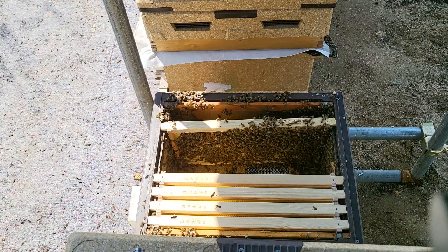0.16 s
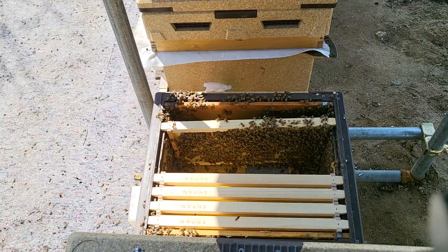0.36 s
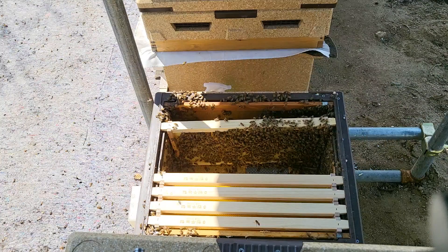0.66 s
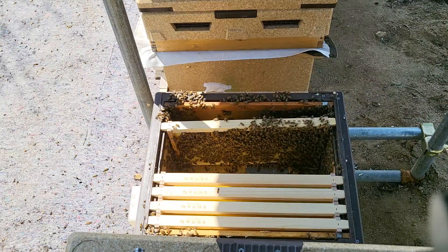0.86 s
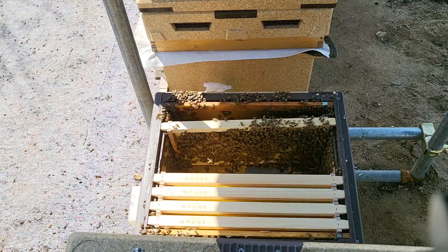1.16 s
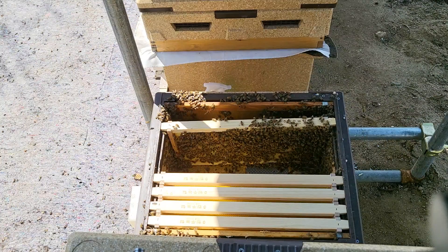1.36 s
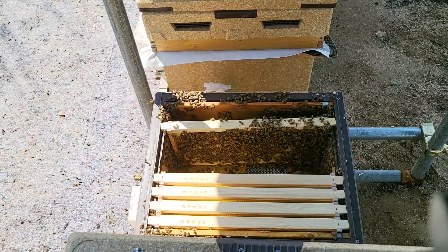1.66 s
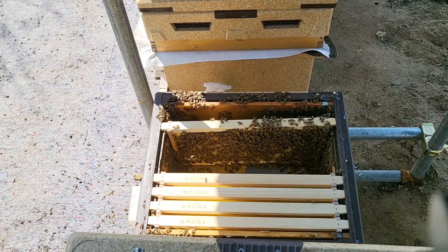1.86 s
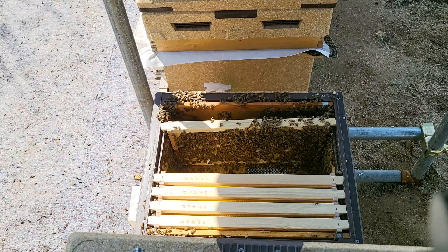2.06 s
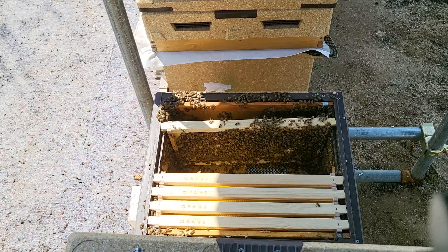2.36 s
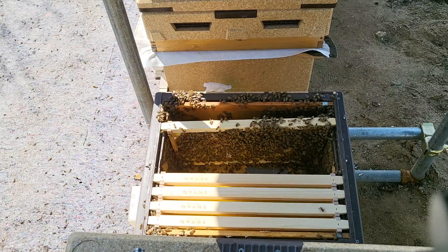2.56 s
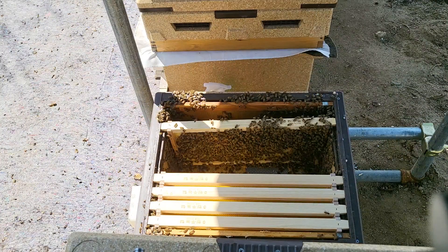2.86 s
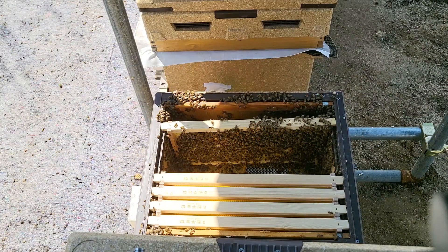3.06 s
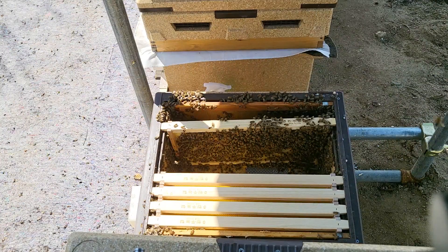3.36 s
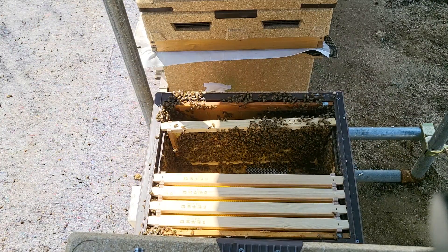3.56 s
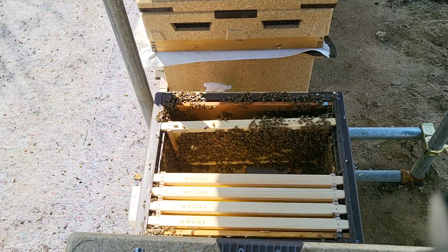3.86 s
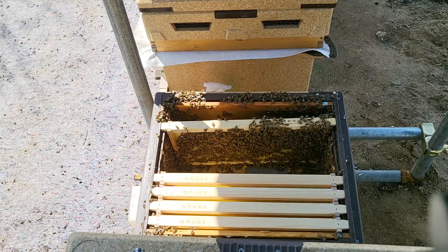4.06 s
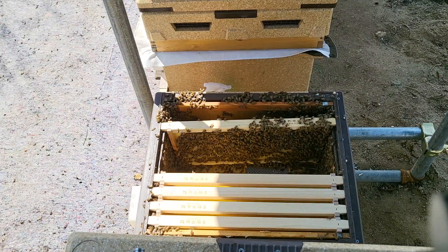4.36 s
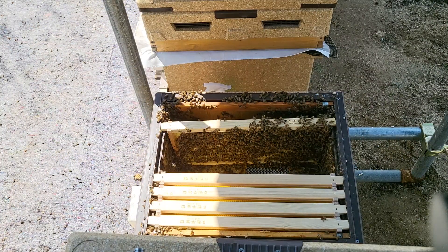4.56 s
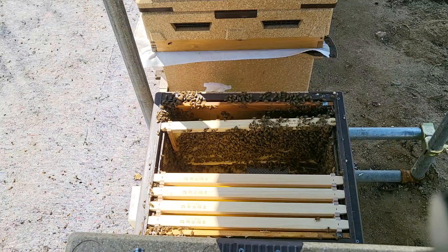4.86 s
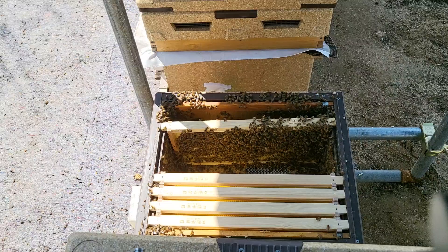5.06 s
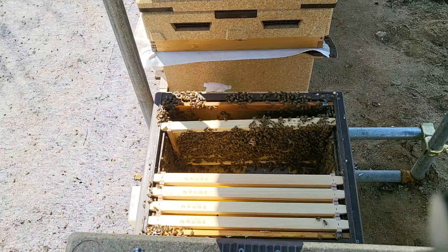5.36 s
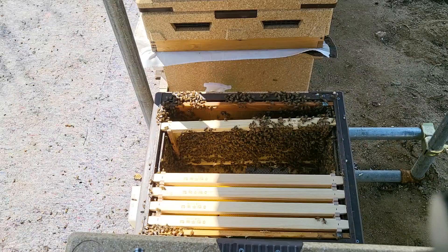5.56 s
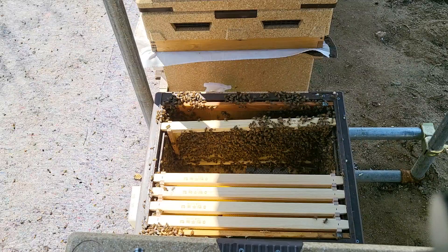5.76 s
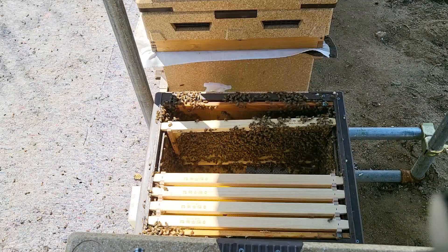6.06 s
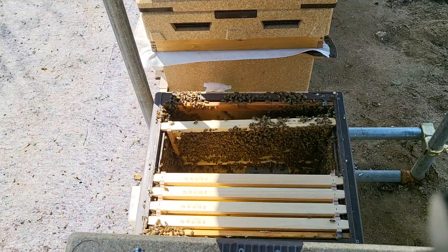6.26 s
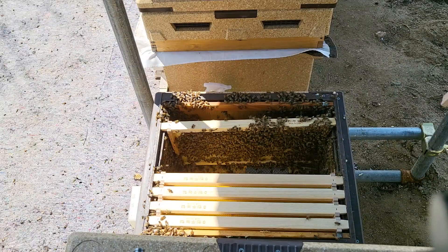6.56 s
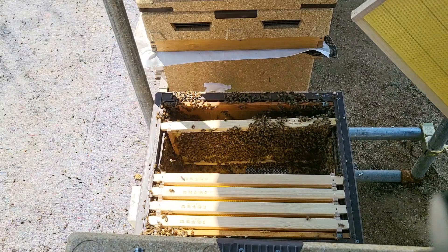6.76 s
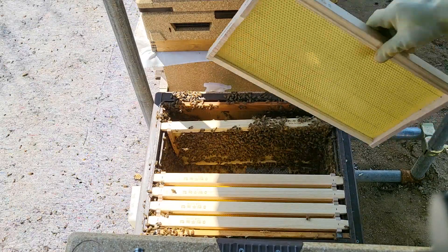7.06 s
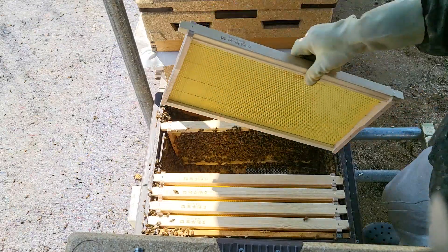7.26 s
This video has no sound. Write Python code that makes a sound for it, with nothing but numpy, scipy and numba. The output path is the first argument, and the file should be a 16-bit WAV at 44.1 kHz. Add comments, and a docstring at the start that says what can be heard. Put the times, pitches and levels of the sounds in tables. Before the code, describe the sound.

Throughout, a crowd of bees makes a low, dense, gently wavering hum around 180 to 260 hertz, over soft hiss and faint cloth and gravel rustle, outdoors and close to a stereo microphone. From 0 to 0.9 seconds strong, low wind pops buffet mainly the right side, with a faint knock near 0.4. Hollow wooden handling begins around 1.0, with heavy box thuds and gritty scuffs at 1.3 to 1.5. A short rising wooden scrape at 2.0 to 2.2 runs into a busy clatter of knocks until 2.5. Softer scuffs and a faint drag come near 3.2, a deep thud at 3.6, lesser bumps around 3.9, and another firm knock at 4.6. A faint tap follows at 5.1. The hum then dominates, with light wind bumps, a small dry wooden click at 6.4 and more low wind flutter around 6.7 to 7.1, ending at about 7.4.

```python
"""Outdoors at an open beehive, two ports of a camera microphone hear a crowd of wings hum over a soft hiss.
The wings are wandering tones; the hiss is coloured noise. A light breeze rumbles as low noise and
pops as short, slowing swings. Close by someone shifts wooden hive parts: thuds ring a hollow box,
edges scuff in bursts of noise, wood drags on a moving tone, and cloth and gravel rustle as noise."""
import sys
import numpy as np
from scipy import signal
from scipy.fft import rfft, irfft, next_fast_len
from scipy.io import wavfile
from scipy.ndimage import uniform_filter1d
from numba import njit

SR = 44100
rng = np.random.default_rng(int(sys.argv[2]) if len(sys.argv) > 2 else 0)


def transcribe(u):
    """Save the signal u as a 16-bit wav file named by the first command-line argument.

    u: samples, shape (n,) or (channels, n), limited to [-1, 1]; the rate is SR.
    q: integer samples, one column per channel.
    """
    v = np.clip(np.atleast_2d(u).T, -1, 1)
    q = np.round(v * 32767).astype(np.int16)
    wavfile.write(sys.argv[1], SR, q)


N = 327222
STEP = 16  # samples between values of slow chance
PAD = next_fast_len(N, real=True)
HANDS_LAG = 8  # samples; sets how far apart the ports hear the handling


def undb(db):
    """Turn decibels into gain."""
    return 10 ** (np.asarray(db) / 20)


def unit(x):
    """Scale to an rms of 1."""
    return x / np.sqrt(np.mean(x ** 2))


def curve(table):
    """Read the columns of a time table, one value a sample."""
    s, *columns = np.transpose(table)
    return [np.interp(np.arange(N) / SR, s, column) for column in columns]


def over_hz(table):
    """Read a frequency table at every spectral bin, along a logarithmic scale."""
    hz, value = np.transpose(table)
    bins = np.fft.rfftfreq(PAD, 1 / SR)
    return np.interp(np.log(bins + 1), np.log(hz), value)


def band(x, lo_hz, hi_hz):
    """Keep the frequencies between two edges."""
    edges = [lo_hz, min(hi_hz, .45 * SR)]
    return signal.sosfilt(signal.butter(2, edges, "band", fs=SR, output="sos"), x)


def colour(x, gain):
    """Weigh every spectral bin."""
    return irfft(rfft(x, PAD) * gain, PAD)[..., :N]


def walk(rate):
    """Random levels held 1 / rate seconds and smoothed twice, one value a step; spread near 1."""
    k = int(SR / STEP / rate) + 1
    levels = np.repeat(rng.standard_normal(N // STEP // k + 2), k)
    smooth = uniform_filter1d(uniform_filter1d(levels, k), k)
    return 1.3 * smooth[:N // STEP + 1]


def hold(x):
    """Stretch slow values to one a sample."""
    return np.repeat(x, STEP)[:N]


def shares(pan_db):
    """Left and right amplitude shares that add up to 1."""
    left = undb(pan_db) / (1 + undb(pan_db))
    return np.array([left, 1 - left])


# how alike the two ports hear noise: (frequency [Hz], likeness [0-1])
LIKENESS = [(60, 1), (300, 0.96), (700, 0.54), (1500, 0.2), (4000, 0.025), (15000, 0.075)]


def ports(near, lag):
    """Two ports hear one noise field alike in the bass and ever less alike in the treble."""
    like = np.clip(over_hz(LIKENESS), 0, 1)
    mix = np.array([like, np.sqrt(1 - like ** 2)])  # shared noise, separate noise
    right = colour(near, mix).sum(axis=0)
    return np.array([np.roll(near[0], lag), right])


@njit
def add_bee(out, beat, hz, gain, side, lag):
    """One bee's wingbeat shape is read at a moving rate into both ports."""
    turn = 0.
    for i in range(max(0, -lag), N - max(0, lag)):
        turn += hz[i // STEP] / SR
        if turn >= 1:
            turn -= 1
        x = gain[i // STEP] * beat[int(turn * len(beat))]
        out[0, i] += x * side
        out[1, i + lag] += x / side


# wingbeat overtones: (multiple of the wingbeat, level [dB])
WING_OVERTONES = [(1, 0), (2, -3), (3, -15.5), (4, -6.5), (5, -11.5), (6, -14), (7, -16), (8, -22.5),
                  (9, -19), (10, -17)]
# groups of bees: (mean wingbeat [Hz], spread [Hz], level before the swell [dB])
BEE_GROUPS = [(203.9, 11, -55.5), (233, 12, -59.5), (261.6, 9, -55.5), (178.2, 6, -62.5)]
# slow swell of the whole colony: (time [s], gain [dB])
COLONY_SWELL = [(0.0, 1.5), (7.42, 0.5)]


def colony(count=10):
    """Every bee beats its wings at its own wandering rate, comes and goes, and has its own lag between ports."""
    out, turn = np.zeros((2, N)), np.arange(4096) / 4096
    for hz, spread_hz, db in BEE_GROUPS:
        places = np.linspace(-1.6, 1.6, count)
        chance = rng.standard_normal((count, 2 + len(WING_OVERTONES)))
        for place, (lag, side, *phases) in zip(places, chance):
            beat = np.zeros(len(turn))
            for (multiple, overtone_db), phase in zip(WING_OVERTONES, phases):
                beat += undb(overtone_db) * np.sin(2 * np.pi * (multiple * turn + phase))
            rate = hz + spread_hz * place + 5.0 * walk(3) + 3.5 * walk(25)
            gain = undb(db + 5.0 * walk(4)) / np.sqrt(count)
            add_bee(out, beat, rate, gain, undb(2.77 * side), int(9 + 5 * lag))
    return out * undb(curve(COLONY_SWELL)[0])


# colour of the hiss: (frequency [Hz], relative level per Hz [dB])
AIR_COLOUR = [(60, -33), (100, -14), (156, -11), (300, -8), (460, -11.5), (730, -15), (1190, -14),
              (1600, -14.5), (2000, -30), (4000, -30), (16000, -23.5)]
AIR_DB = -46.5  # rms level at the ports, before flicker and tilt


def air():
    """Far wings, distant land and the microphone's own hiss blend into a gently flickering bed."""
    noise = colour(rng.standard_normal((2, N)), undb(over_hz(AIR_COLOUR)))
    flicker_db = .7 * hold(walk(10))
    return ports(unit(noise) * undb(AIR_DB + flicker_db), -8)


# breeze rumble: (time [s], level [dB], left minus right [dB])
BREEZE_RUMBLE = [(0.0, -24.5, -28), (0.18, -27.5, -22), (0.28, -39.5, -2), (0.6, -27, -28),
                 (0.75, -47, -10), (1.1, -43, 1), (1.5, -45.5, 0), (2.0, -40.5, -1), (2.3, -36, 7),
                 (2.8, -40, 2), (3.3, -43, -4), (3.72, -42.5, 6), (4.2, -52, 3), (4.9, -44, 3),
                 (5.5, -48, -10), (6.2, -50.5, -2), (6.85, -39.5, -16), (7.1, -44, 8), (7.42, -52.5, -6)]
# loud breeze pops, starting at 1.81 times their pace:
# (time [s], peak level shared by the ports [dB], pace [Hz], left minus right [dB], length [cycles])
LOUD_POPS = [(0.019, -12.5, 121, -40, 1.56), (0.057, -13.5, 74.5, -29, 0.47), (0.149, -10.5, 142, -38, 1.5),
             (0.176, -15, 68.5, -27, 0.44), (0.23, -36, 56.5, -2, 1.1), (0.329, -22, 51.7, -15, 0.83),
             (0.458, -21, 61.9, -25, 0.6), (0.5, -12, 63.7, -32, 0.36), (0.539, -23, 121, -21, 3.4),
             (0.592, -18, 67, -28, 1.8), (0.631, -17, 57, -14, 0.8), (0.763, -26.5, 74.4, -27, 2.05),
             (0.839, -24.5, 57, -15, 0.41), (1.039, -30, 72, 3, 2.2), (2.778, -27, 51.7, -8, 1.1),
             (3.02, -24, 60.7, 16, 0.99), (4.47, -30, 78.1, 3, 2.1), (5.129, -38, 199, 3.5, 2),
             (5.612, -28.5, 64, 5, 1.7), (5.659, -27, 51.1, -6, 1.2), (5.937, -33, 59.2, 11, 2.2),
             (5.977, -34, 51, -7, 1.5), (6.418, -35, 53.5, 1, 1.4), (6.68, -29.5, 60, -16, 1.4),
             (6.828, -29.5, 150, -23, 1.6), (6.977, -28.5, 84, -25, 2.9), (7.052, -28.5, 63, 14, 1.8),
             (7.079, -24, 56.8, -12, 1.7)]
GUST_DB, GUST_PER_S, VEER_DB, VEER_PER_S = 5.5, 9, 3, 8  # chance wander of level and side
FAINT_POP_DB, FAINT_POP_HZ, FAINT_POP_CYCLES = 7, 57.5, 1.66  # dB above the rumble, middle pace, length


def breeze(count=16):
    """Eddies roll over each port separately: a low rumble, and lone pops when one bursts on the opening."""
    db, pan_db = curve(BREEZE_RUMBLE)
    rumble = np.array([unit(band(band(rng.standard_normal(N), 33.0, 67.6), 28, 153)) for _ in range(2)])
    gust_db = db + GUST_DB * hold(walk(GUST_PER_S))
    side_db = pan_db + VEER_DB * hold(walk(VEER_PER_S))
    out = np.sqrt(shares(2 * side_db)) * undb(gust_db) * rumble

    when, pitch = rng.random((count, 2)).T
    at = (when * N).astype(int)
    faint_hz = FAINT_POP_HZ * 2 ** (pitch - .5)
    faint_pops = zip(at / SR, db[at] + FAINT_POP_DB, faint_hz, side_db[at], [FAINT_POP_CYCLES] * count)
    for s, peak_db, hz, pop_pan_db, cycles in [*LOUD_POPS, *faint_pops]:
        t = np.arange(int(6 * cycles / hz * SR)) / SR
        swing = t * hz / cycles
        # the membrane is kicked, then swings back ever more slowly
        kick = -3.1 * swing * np.exp(-2.2 * swing)
        pop = kick * np.sin(2 * np.pi * 1.81 * hz * t / (1 + 0.43 * swing))
        i = int(s * SR)
        out[:, i:i + len(t)] += 2 * undb(peak_db) * shares(pop_pan_db)[:, None] * pop[:N - i]
    return out


# rustle before the band shares: (time [s], level [dB], level of the treble above 9 kHz [dB])
RUSTLE_LEVELS = [(0.0, -53.5, -63), (0.47, -52.5, -60), (0.91, -54, -61), (1.4, -51.5, -59),
                 (1.63, -53.5, -82), (1.84, -55, -52.5), (2.27, -45.5, -58.5), (2.4, -52.5, -65),
                 (2.6, -52.5, -54), (2.85, -52, -51.5), (3.05, -52, -53.5), (3.15, -49.5, -57),
                 (3.29, -53.5, -61), (3.8, -53, -63), (4.38, -54.5, -73), (4.69, -52.5, -57),
                 (5.48, -53.5, -69), (6.1, -53.5, -66), (6.86, -52, -58.5), (7.42, -54.5, -66)]
RUSTLE_BODY_DB = 3  # the body band lies this far above the level


def rustle():
    """Cloth and gravel rustle: slowly changing gains for the body, rasp, grit and sizzle noise."""
    db, sizzle_db = curve(RUSTLE_LEVELS)
    return undb(np.array([db + RUSTLE_BODY_DB, db, db, sizzle_db]))


# scuffs before crackle and band shares: (time [s], grit level [dB], body level [dB], sizzle level [dB],
# edge ring [Hz], ring above the body level [dB], time for the burst to fall 60 dB [s])
SCUFF_BURSTS = [(0.4386, -48, -39, -60, 885, 9, 0.11), (1.0294, -52, -46, -52, 890, -6, 0.14),
                (1.302, -47, -44, -47, 964, 9, 0.16), (1.322, -35, -31, -32.5, 1200, -13, 0.11),
                (1.3727, -32, -34, -34.5, 807, -6, 0.047), (1.4361, -41, -28.5, -46, 740, -5, 0.088),
                (1.481, -35, -33, -29.5, 1050, -6, 0.06), (1.4875, -27.5, -22.5, -48, 733, 0, 0.082),
                (1.5194, -59, -51, -43, 980, -4, 0.077), (1.8533, -38, -36.5, -50, 1000, -4, 0.14),
                (2.1094, -46, -45, -46, 780, -4, .14), (2.1395, -57, -39, -46, 1220, 7, 0.099),
                (2.1762, -25.5, -22, -34.5, 1310, 2, 0.11), (2.2094, -46, -42, -62, 985, -4, 0.062),
                (2.325, -21, -18, -53, 710, -9, 0.037), (2.331, -20.5, -28, -41, 1360, 16, 0.038),
                (2.338, -30, -16.5, -50, 1292, 7, 0.098), (2.379, -54, -24, -64, 990, -1, 0.039),
                (2.4934, -57, -45, -48, 1420, 0, 0.075), (2.8094, -43, -39, -62, 760, -7, 0.13),
                (2.8447, -50, -36, -61, 1050, -8, 0.13), (3.0999, -46, -50, -62, 1560, -4, 0.16),
                (3.1314, -58, -50, -60, 1020, 9, 0.38), (3.165, -55, -47, -56, 1040, -1, 0.074),
                (3.1833, -41, -39, -54, 1020, 13, 0.1), (3.2064, -39, -44, -50, 3400, 6, 0.088),
                (3.503, -44, -39, -49, 1680, -1, 0.083), (3.8344, -52, -49, -50, 970, 13, 0.14),
                (3.8704, -48, -36, -47, 900, -2, .1), (4.2547, -57, -44, -64, 1500, -4, 0.05),
                (4.541, -45, -38, -55, 1290, 8, 0.11), (4.5894, -56, -45, -51, 730, -4, 0.1),
                (4.6664, -52, -40.5, -48, 1030, 2, .15), (5.068, -64, -55, -48, 990, 3, 0.12),
                (5.58, -46, -45, -52, 872, -6, 0.12), (6.3582, -49, -35.5, -54, 690, 7, .084),
                (6.3724, -43, -25.5, -50, 906, 4.5, 0.053), (6.3814, -51, -51, -55, 1190, 0, 0.058)]
SCUFF_RISE_S, RASP_DB = 0.0025, -5  # rasp lies below the mean of grit and body
CRACKLE_DB, CRACKLE_PER_S = 1, 390  # a scuff breaks into separate contacts


def scuffs():
    """Edges brush past each other: bursts of gritty noise with a rough edge ring, joined by the rustle."""
    t = np.arange(SR // 4) / SR
    shape, ring = np.zeros((4, N + SR)), np.zeros(N + SR)
    for s, grit_db, body_db, sizzle_db, hz, ring_db, t60 in SCUFF_BURSTS:
        rasp_db = (grit_db + body_db) / 2 + RASP_DB
        burst = (1 - np.exp(-t / SCUFF_RISE_S)) * np.exp(-np.log(1000) * t / max(t60, .01))
        i = int(s * SR)
        shape[:, i:i + len(t)] += undb([[body_db], [rasp_db], [grit_db], [sizzle_db]]) * burst
        ring[i:i + len(t)] += undb(body_db + ring_db) * burst ** 2 * np.sin(2 * np.pi * hz * t)

    crackle = undb(CRACKLE_DB * hold(walk(CRACKLE_PER_S)))
    shape = shape[:, :N] * crackle + rustle()
    grain = rng.standard_normal((2, N)) * undb(0.53 * hold(walk(300)))
    ring = ring[:N] * undb(1.5 * hold(walk(250)))
    # body, rasp, grit and sizzle: (lowest [Hz], highest [Hz], share [dB])
    bands = [(610, 1840, -5), (1880, 3870, -5.0), (3910, 6900, -5.5), (9250, 20500, 4.0)]
    noise = np.zeros((2, N))
    for k, (lo, hi, db) in enumerate(bands):
        # neighbouring bands alternate in sign so that they add where they overlap
        noise += (-1) ** k * shape[k] * undb(db) * unit(band(grain, lo, hi))
    return ports(noise, HANDS_LAG) + np.array([np.roll(ring, HANDS_LAG), ring])


# ways the hollow box rings: (frequency [Hz], relative level [dB], time to fall 60 dB at ring share 1 [s])
BOX_MODES = [(59.2, 9.5, 0.14), (89.2, 4.5, 0.28), (113, 3, 0.19), (125.4, 2, 0.32), (142.7, -2, 0.21),
             (171, 3, 0.23), (181, 10.5, 0.18), (214.7, 8.5, 0.083), (283.2, 2, 0.13), (313.5, -3, 0.092),
             (344, -1, 0.18), (424.6, -1.5, 0.12), (467, -6.5, 0.11), (545, 5.5, 0.049), (670, -7, 0.12),
             (752, -21.5, 0.23), (950, -38, 0.1), (1086, 12.5, 0.028), (1168, -1.5, 0.092),
             (1294, 0, 0.078), (1450, -6, 0.033)]
# thuds, levels before the box's own: (time [s], low modes [dB], upper modes [dB],
# favoured upper mode [Hz], contact time for a 124 Hz mode [s], ring share [times])
BOX_THUDS = [(0.441, -50, -36, 315, 0.004, 0.96), (1.012, -29.5, -40, 260, 0.0062, .61),
             (1.299, -17, -21, 425, 0.028, 1.03), (1.321, -18, -23, 303, 0.0059, 0.8),
             (1.377, -30, -35.5, 487, 0.02, 2.3), (1.438, -30, -32, 444, .0086, 2.3),
             (1.482, -9.5, -14, 567, 0.01, 0.74), (1.61, -38.5, -44, 318, 0.0047, 2),
             (1.864, -31.5, -29.5, 344, 0.013, 0.71), (1.912, -34.5, -38, 200, .0096, 0.78),
             (2.171, -17.5, -19.5, 413, .01, 1.04), (2.2, -21, -23.5, 353, 0.0084, 0.53),
             (2.234, -21, -34, 326, 0.019, 1.33), (2.266, -38, -23.5, 246, .0059, .61),
             (2.299, -45, -24, 430, 0.031, 1.74), (2.334, -24, -19, 430, 0.0042, 0.62),
             (2.379, -37, -27, 425, 0.0036, 0.4), (2.405, -30, -48, 353, 0.0068, 0.51),
             (2.494, -13, -25, 350, 0.017, 0.68), (2.539, -42, -46, 220, 0.025, 2.8),
             (2.796, -37, -38, 468, 0.0061, 1.03), (3.163, -38.5, -36.5, 402, .0062, 1.3),
             (3.181, -35, -36, 1020, 0.0085, 1.1), (3.361, -54, -33, 464, 0.0039, 0.4),
             (3.492, -51, -35, 363, .0079, .6), (3.564, -35, -35, 318, 0.0085, 2.4),
             (3.608, -11, -20, 436, .013, 0.49), (3.73, -54, -41.5, 220, .008, .71),
             (3.824, -41.5, -29.5, 350, 0.0049, 1.9), (3.876, -24, -27.5, 217, 0.0087, 0.67),
             (3.894, -31, -33, 190, 0.01, 0.73), (3.924, -32.5, -36, 190, 0.0053, .48),
             (4.077, -40, -38, 444, 0.008, 0.61), (4.541, -41, -35.5, 387, 0.0074, 2.1),
             (4.576, -17.5, -21.5, 427, 0.0094, 0.59), (4.677, -26.5, -37, 250, 0.005, 0.57),
             (4.697, -37, -29, 280, 0.0097, 0.43), (5.092, -42, -31, 346, 0.013, .52),
             (6.371, -39.5, -33, 912, 0.0059, .54)]
DEEP_DB, FAR_DB_PER_OCT = -10, -9  # deepest modes below the low ones; loss away from the favoured mode


def thuds():
    """A soft contact pushes the box; each blow lands elsewhere and weighs the modes anew."""
    out = np.zeros((2, N + SR))
    hz, db, t60 = np.transpose(BOX_MODES)[:, :, None]
    group = np.digitize(hz, [95, 150])  # deepest, low and upper modes
    chance = rng.random((len(BOX_THUDS), 2, len(BOX_MODES), 1))
    for (s, low_db, high_db, near_hz, contact, ring), (turn, skew) in zip(BOX_THUDS, chance):
        t = np.arange(int(SR / 4 * np.clip(ring, .2, 1))) / SR
        # upper modes far from the favoured one are struck near their still lines
        far_db = FAR_DB_PER_OCT * np.abs(np.log2(hz / near_hz))
        blow_db = np.choose(group, [low_db + DEEP_DB, low_db, high_db + far_db])
        swell = 1 - np.exp(-(t * (hz / 124) ** 0.45 / max(contact, .001)) ** 2)
        # only the upper modes start at a random phase
        angle = 2 * np.pi * (hz * t + turn * (group > 1))
        decay = np.log(1000) * t / (t60 * max(ring, .1))
        modes = undb(blow_db + db) * swell * np.exp(1j * angle - decay)
        # each mode radiates from another panel, so it reaches the right port early by its own amount
        early = undb(-0.7) * np.exp(2j * np.pi * hz * HANDS_LAG * 4.16 * skew / SR)
        both_ports = np.hstack([np.ones_like(early), early]).T
        i = int(s * SR)
        out[:, i:i + len(t)] += (both_ports @ modes).imag
    return out[:, :N]


# one table for each drag, before its chance wander: (time [s], resonance [Hz], level [dB])
DRAG_PATHS = [
    [(2.0, 165.8, -49), (2.035, 173, -36.5), (2.053, 185, -36), (2.065, 198, -28.5), (2.09, 264, -32.5),
     (2.115, 322, -33), (2.135, 196, -36), (2.17, 229, -28.5)],
    [(3.13, 219, -56), (3.154, 255.4, -50), (3.194, 190, -43), (3.248, 209, -37.5), (3.27, 196, -50)],
]


def drags():
    """Wood slides on wood: uneven slips shake a resonance that moves with the contact, over a duller scrape."""
    out, s = np.zeros(N), np.arange(N) / SR
    scrape = unit(band(rng.standard_normal(N), 240, 480))
    for path in DRAG_PATHS:
        hz, db = curve(path)
        start, end = path[0][0], path[-1][0]
        gate = np.clip(np.minimum(s - start, end - s) / 0.0048, 0, 1)  # 4.8 ms fades
        angle = 2 * np.pi * np.cumsum(hz * (1 + 0.13 * hold(walk(70)))) / SR
        gain = gate * undb(db + 3.4 * hold(walk(45)))
        out += gain * (np.sqrt(2) * np.sin(angle) + 0.57 * scrape)
    return np.array([out, undb(-3.0) * out])


# uneven hearing of the two ports: (frequency [Hz], left minus right [dB])
TILT = [(60, -1.5), (110, -2.0), (200, 1.5), (380, 2.3), (700, 1.3), (1290, 3.0), (2380, 2.7), (4400, 4.0),
        (8120, 4.5), (15000, 4.6)]


def scene():
    """Airborne sound takes the ports' tilt; breeze, thuds and drags are added without it."""
    tilt = undb(np.array([.5, -.5])[:, None] * over_hz(TILT))
    airborne = colour(colony() + air() + scuffs(), tilt)
    return airborne + breeze() + thuds() + drags()


# colour of the microphone housing: (frequency [Hz], gain [dB])
HOUSING_COLOUR = [(400, 0.5), (530, 1), (610, -2), (720, 2), (810, -2), (920, 2), (1100, -2.5),
                  (4500, -2.5), (6500, -1.5), (7200, -1.5), (8200, -6.5), (9500, -4), (11000, -4.5)]
TOP_HZ = 15850  # upper limit of the recorder


def record(dry):
    """The housing colours the sound; the recorder weakens the lowest bass and cuts the top."""
    dry = colour(dry, undb(over_hz(HOUSING_COLOUR)))
    dry = signal.sosfilt(signal.butter(1, 42, "high", fs=SR, output="sos"), dry)
    return signal.sosfilt(signal.ellip(10, .2, 80, TOP_HZ, fs=SR, output="sos"), dry)


dry = scene()
out = record(dry)
transcribe(out)
```